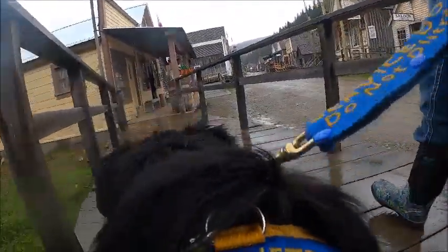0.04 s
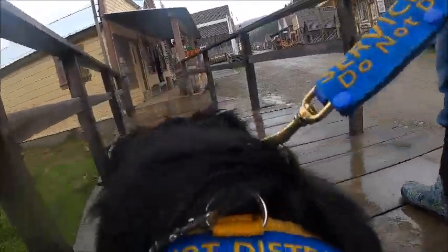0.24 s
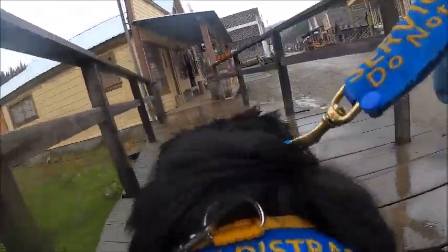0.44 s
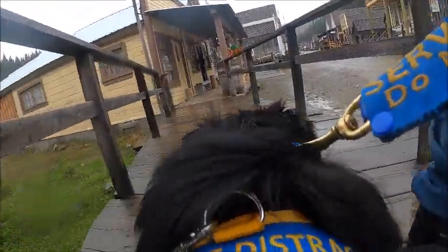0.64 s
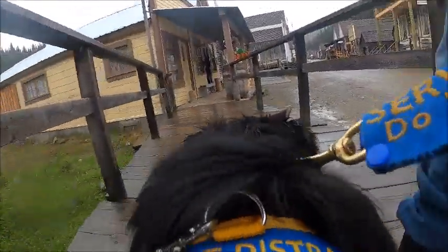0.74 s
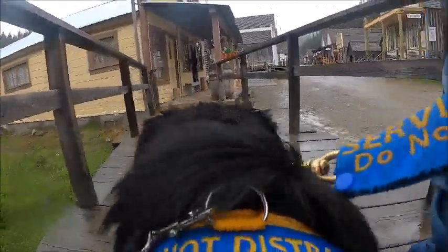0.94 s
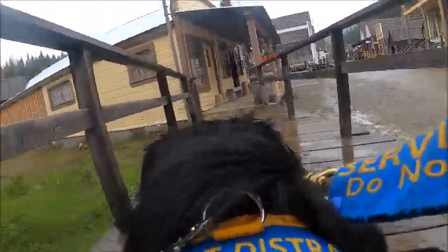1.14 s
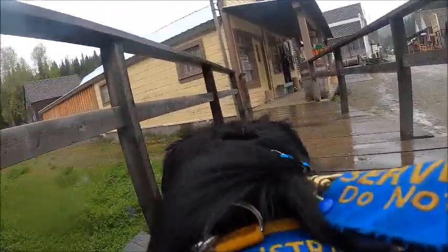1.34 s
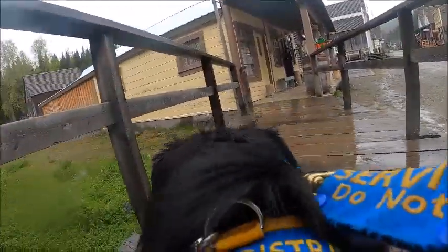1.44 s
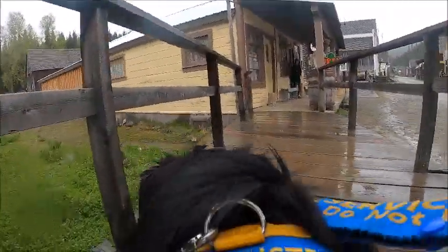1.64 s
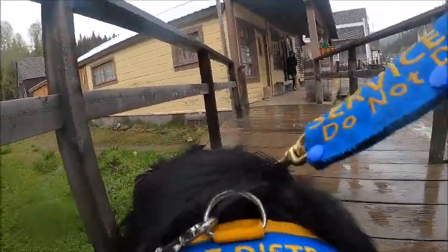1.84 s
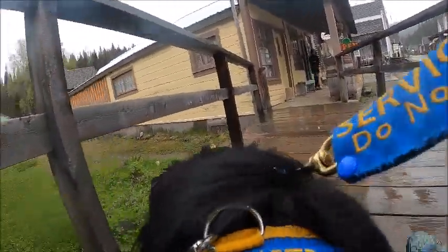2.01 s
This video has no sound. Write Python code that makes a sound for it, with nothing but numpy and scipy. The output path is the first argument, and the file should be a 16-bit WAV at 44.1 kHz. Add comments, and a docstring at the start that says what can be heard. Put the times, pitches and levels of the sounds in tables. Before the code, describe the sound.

Close on a walking dog's harness, uneven low bumps and small plastic ticks come first, then a light clip rattle and woody footfalls, the heaviest pair around one and a half seconds, outdoors.

```python
"""A wet boardwalk outdoors, with a camera on a dog's harness beside a walker in rubber boots.
Boots and paws knock the boards, which ring in their modes while grit crunches under the sole.
The gait jolts the camera in sagging low thumps and ticks its mount in short hollow pulses.
The leash clip clinks and rattles as metal contacts excite its modes; fabric rustles in small grains
and the harness sways in lumpy low noise, over a soft hiss of filtered noise."""
import sys
import numpy as np
from scipy import signal
from scipy.fft import rfft, irfft
from scipy.io import wavfile
from scipy.ndimage import uniform_filter1d

SR = 44100
rng = np.random.default_rng(int(sys.argv[2]) if len(sys.argv) > 2 else 0)


def generate_wav(signal):
    """Clip the signal to [-1, 1] and save it as 16-bit WAV at the path in sys.argv[1]."""
    frames = np.transpose(np.atleast_2d(signal))
    scaled = np.clip(frames, -1, 1) * 32767
    pcm = np.round(scaled).astype(np.int16)
    wavfile.write(sys.argv[1], SR, pcm)


def to_linear_factor(level_db):
    """Convert decibel levels (scalar or array-like) to linear amplitude factors."""
    exponent = np.asarray(level_db, float) / 20
    return 10 ** exponent


N = 91287  # length in samples


def evened(x):
    """Normalisation: scales a signal to unit root-mean-square."""
    return x / np.sqrt(np.mean(x ** 2) + 1e-20)


def read(points, hz):
    """Interpolation of a spectrum table along logarithmic frequency."""
    f, value = np.transpose(points)
    return np.interp(np.log(hz + 1), np.log(f + 1), value)


def curve(rows):
    """Interpolation of an envelope table along time."""
    return np.interp(np.arange(N) / SR, *np.transpose(rows))


def add(mix, s, sound):
    """Superposition: adds a sound to the mix from s seconds on."""
    part = mix[..., round(s * SR):][..., :sound.shape[-1]]
    part += sound[..., :part.shape[-1]]


def panned(x, db):
    """Level difference: the left channel exceeds the right by db."""
    return x * to_linear_factor(np.array([db / 2, -db / 2])).reshape(2, -1)


def coloured(x, tone):
    """Linear filtering: shapes x by a spectrum table, then evens its level."""
    hz = np.fft.rfftfreq(N, 1 / SR)
    return evened(irfft(rfft(x) * to_linear_factor(read(tone, hz)), N))


def blip(hz, cycles):
    """Windowed oscillation: a few cycles under a bell-shaped window, peak 1."""
    u = np.arange(1200) / SR * hz / max(cycles, 1) - 1
    x = np.exp(-5 * u ** 2) * np.cos(2 * np.pi * cycles * u)
    return x / abs(x).max()


def grains(per_s, spread_db):
    """Random point process: sparse impulses of either sign and scattered level."""
    heights = to_linear_factor(spread_db * np.minimum(rng.exponential(1, N), 4))
    signs = rng.choice([-1., 1.], N)
    return heights * signs * (rng.random(N) < per_s / SR)


def noise_pair(same):
    """Partial coherence: two noise channels share a part set by likeness same(Hz)."""
    a, b = rfft(rng.standard_normal((2, N)))
    same = np.clip(same, 0, 1)
    return irfft(np.array([a, same * a + np.sqrt(1 - same ** 2) * b]), N)


# Balance of the two microphone ports. Each row: frequency in Hz, left-right level in dB.
PORT_BALANCE = [(300, -0.5), (4000, 2.5), (8000, 0)]


def ports(x):
    """Interaural-style cues: the two ports receive sound with their own delay and level."""
    lag_s = .00003  # left lags right
    hz = np.fft.rfftfreq(N, 1 / SR)
    half = to_linear_factor(read(PORT_BALANCE, hz) / 2) * np.exp(-1j * np.pi * hz * lag_s)
    return irfft(rfft(x) * np.array([half, 1 / half]), N)


def echo(x):
    """Early reflections: rails and walls return short, scattered, decaying copies."""
    t60_s, level_db = .09, -7
    t = np.arange(round(.15 * SR)) / SR
    signs = rng.choice([-1., 1.], (2, len(t)))
    present = rng.random((2, len(t))) < .05
    taps = signs * present * to_linear_factor(-60 * t / t60_s) * (t > .002)
    taps = taps / np.linalg.norm(taps[0])
    return to_linear_factor(level_db) * signal.fftconvolve(x[None], taps, axes=1)[:, :N]


# Spectrum of the outdoor wash. Each row: frequency in Hz, relative level in dB.
HISS_TONE = [(60, -1.5), (270, -10.5), (870, -20), (1600, -17.5), (3300, -29.5), (7600, -30.5), (8800, -42),
             (14000, -49)]
# Coherence of the wash. Each row: frequency in Hz, left-right likeness from 0 to 1.
HISS_LIKENESS = [(300, 0.86), (2400, 0.46), (12000, 0.13)]


def hiss():
    """Diffuse field: a distant outdoor wash, less alike at the two ports as frequency rises."""
    level_db = -56
    pair = noise_pair(read(HISS_LIKENESS, np.fft.rfftfreq(N, 1 / SR)))
    return to_linear_factor(level_db) * coloured(pair, HISS_TONE)


# Envelope of the harness rumble. Each row: time in seconds, level in dB before the lumps.
SWAY_LEVEL = [(0, -64), (.07, -41.5), (.14, -54.5), (.24, -65), (.29, -34.5), (.34, -51.5), (.45, -42),
              (.62, -37), (.8, -49.5), (.94, -39.5), (1.04, -48.5), (1.16, -38.5), (1.38, -65), (1.48, -59),
              (1.54, -39.5), (1.8, -36.5), (2.0, -45.5)]
# Spectrum of the rumble. Each row: frequency in Hz, relative level in dB.
SWAY_SPECTRUM = [(15, -6), (45, 1.5), (93, -11), (226, -21), (450, -37.5), (900, -70)]
# Coherence of the rumble. Each row: frequency in Hz, left-right likeness from 0 to 1.
SWAY_LIKENESS = [(30, .35), (70, .5), (140, .95)]


def sway():
    """Amplitude modulation: slow random lumps swell a low rumble as the harness shifts."""
    lumps_db, pan_db = 3, 1
    smooth = uniform_filter1d(rng.standard_normal(N), 1000)
    lumps = evened(uniform_filter1d(smooth, 1000))
    level = to_linear_factor(curve(SWAY_LEVEL) + lumps_db * lumps)
    pair = noise_pair(read(SWAY_LIKENESS, np.fft.rfftfreq(N, 1 / SR)))
    return panned(level, pan_db) * coloured(pair, SWAY_SPECTRUM)


# Envelope of fabric, wet fur and scuffing. Each row: time in seconds, level in dB.
RUSTLE_LEVEL = [(0, -65), (.12, -62.5), (.22, -55.5), (.33, -58), (.45, -55), (.55, -59), (.62, -66.5),
                (.85, -64), (1.0, -65), (1.1, -60), (1.2, -55.5), (1.27, -68.5), (1.59, -59.5), (1.63, -51),
                (1.7, -58.5), (1.79, -51.5), (1.84, -61), (2.0, -61)]
# Spectral weighting of the rustle. Each row: frequency in Hz, relative level in dB.
RUSTLE_SPECTRUM = [(400, -10), (900, -5.5), (1500, 2.5), (2800, -2.5), (4000, 1.5), (7500, -4),
                   (9000, -6.5), (15500, -21)]


def rustle():
    """Granular friction: small grains of many pitches, partly different at each port."""
    per_s, spread_db, cycles = 550, 4.2, 6.004  # grain rate is for each pitch

    def train():
        """Superposition of grain trains at logarithmically spaced pitches."""
        pitches = np.geomspace(450, 14500, num=14)
        return sum(np.convolve(grains(per_s, spread_db), blip(hz, cycles))[:N] for hz in pitches)

    shared = train()
    separate = np.array([train(), train()])
    return to_linear_factor(curve(RUSTLE_LEVEL)) * coloured(shared + 0.33 * separate, RUSTLE_SPECTRUM)


# Jolts through the harness. Each row: start in seconds, level in dB before onset and fade,
# frequency it settles to in Hz, 60 dB decay time in seconds before the fade, left-right level in dB.
JOLT_EVENTS = [(0.263, -20.5, 91, 0.05, 1), (0.657, -41, 37.5, 1, 24.5), (.72, -28.5, 33.4, 0.19, 17.5),
               (.755, -39.5, 110.4, 0.33, 3), (1.161, -30.5, 35.6, 0.3, 11.5),
               (1.712, -11.5, 75.4, 0.07, 0.5), (1.752, -30.5, 55.7, 0.25, 14),
               (2.055, -24.5, 54, 0.91, 13.5)]


def jolts():
    """Damped oscillation: soft low thumps whose pitch sags as they die."""
    rise_s, sag_s, sag_depth = 0.0057, 0.0094, 1.65
    out, t = np.zeros((2, N)), np.arange(round(.3 * SR)) / SR
    onset, fade = 1 - np.exp(-t / rise_s), 1 - t / t[-1]
    for s, db, hz, t60, pan_db in JOLT_EVENTS:
        turns = hz * t * (1 + sag_depth * np.exp(-t / sag_s))
        thump = to_linear_factor(db - 60 * t / t60) * onset * fade * -np.sin(2 * np.pi * turns)
        add(out, s, panned(thump, pan_db))
    return out


# Dull ticks of the mount. Each row: start in seconds, peak of the knock in dB, frequency in Hz.
TICK_EVENTS = [(0.241, -19, 1470), (0.244, -39, 1480), (.282, -35.5, 1200), (0.566, -33, 1230),
               (0.689, -32, 1270), (0.988, -33.5, 1530), (1.09, -35.5, 840), (1.119, -36, 1560),
               (1.211, -30, 970), (1.342, -37, 1560), (1.786, -51, 1310), (1.893, -39.5, 1300),
               (1.953, -32.5, 1294)]


def ticks():
    """Impulse and resonance: short plastic knocks followed by a brief hollow two-tone ring."""
    cycles, ring_db, ring_t60_s = 1.145, -25, 0.045
    out, t = np.zeros(N), np.arange(1500) / SR
    for s, db, hz in TICK_EVENTS:
        add(out, s, to_linear_factor(db) * blip(hz, cycles))
        tones = np.sin(2 * np.pi * hz * t) + np.sin(1.25 * np.pi * hz * t)
        ring = to_linear_factor(db + ring_db - 60 * t / ring_t60_s) * tones
        add(out, s + cycles / hz, ring)  # from the middle of the knock
    return out


# Modes of the leash clip. Each row: frequency in Hz, level in dB before selection by pitch,
# 60 dB decay time in seconds when undamped.
CLIP_MODES = [(4280, 3, .018), (6225, 0, .04), (7100, -9, .025), (8160, -6, .045), (10100, -4, .03),
              (11700, 1, .035), (14250, -8, .04)]


def clip_ring(hz, octaves, damping=1):
    floor = .07  # weight left to far modes
    t = np.arange(4000) / SR
    ring = np.zeros(len(t))
    for f, db, t60 in CLIP_MODES:
        weight = floor + np.exp(-(np.log2(f / hz) / octaves) ** 2)
        ring += weight * to_linear_factor(db - 60 * damping * t / t60) * np.sin(2 * np.pi * f * t)
    return ring


# Clip sliding on its ring. Each row: time in seconds, level in dB.
RATTLE_LEVEL = [(.4, -53), (.425, -64), (.45, -53.5), (.515, -64), (.54, -46), (.556, -57)]


def rattle():
    per_s, spread_db = 520, 5
    damping = 2.5  # sliding contact shortens the ring
    t = np.arange(N) / SR
    on = (t > RATTLE_LEVEL[0][0]) & (t < RATTLE_LEVEL[-1][0])
    hum = signal.oaconvolve(grains(per_s, spread_db), clip_ring(4980, 0.37, damping))[:N]
    return on * to_linear_factor(curve(RATTLE_LEVEL)) * evened(hum)


# Leash clip clinks. Each row: start in seconds, peak of the tick in dB, tick frequency in Hz,
# gain of the ring in dB relative to that peak.
CLINK_EVENTS = [(0.238, -39, 6200, -21), (0.318, -39.5, 3800, -18), (.338, -38.5, 4140, -37),
                (0.36, -42, 6430, -14), (0.407, -43.5, 4470, 2.5), (0.5142, -35, 6500, -29),
                (0.52, -45.5, 10800, -2), (0.535, -40, 11000, -24), (0.546, -41, 6200, 1),
                (0.798, -46.5, 3550, -35), (1.039, -46.5, 3060, -28), (1.088, -39, 3940, -8),
                (1.094, -39, 8400, -5), (1.117, -48.5, 7060, -5), (1.197, -38, 3450, -9),
                (1.209, -47.5, 7600, 1), (1.341, -46, 6940, 3.5), (1.977, -33.5, 5000, -27),
                (2.046, -39, 3720, -1)]


def clinks():
    """Impact excitation: a burst of metal contacts gives a tick, a bright snap and a modal ring."""
    cycles, burst_s, snap_db, pick_octaves = 1.493, 0.0028, -9, .25
    out, u = np.zeros(N), np.arange(400) / SR / burst_s
    for s, db, hz, ring_db in CLINK_EVENTS:
        burst = rng.standard_normal(len(u)) * u * np.exp(-4 * u)
        tick = np.convolve(burst, blip(hz, cycles))
        snap = np.diff(burst)  # differencing favours the treble
        ring = np.convolve(burst, clip_ring(hz, pick_octaves)) / np.linalg.norm(burst)
        add(out, s, to_linear_factor(db) * tick / abs(tick).max())
        add(out, s, to_linear_factor(db + snap_db) * snap / abs(snap).max())
        add(out, s, to_linear_factor(db + ring_db) * ring)
    return out


# Resonances of the crunch under the sole, a list of frequencies in Hz.
CRUNCH_MODES = [593, 810, 985, 1270, 1630, 1970, 2350]


def crunch(noise, draw, t):
    """Granular excitation: a dying shower of grit rings woody resonances under the sole."""
    per_s, t60_s, ring_t60_s = 1200, 0.13, 0.014
    short = t[:2000]
    woody = np.zeros(len(short))
    for hz in CRUNCH_MODES:
        woody += np.sqrt(CRUNCH_MODES[0] / hz) * np.sin(2 * np.pi * hz * short)
    woody *= to_linear_factor(-60 * short / ring_t60_s)
    grit = noise * (draw < per_s / SR) * to_linear_factor(-60 * t / t60_s)
    grit[0] = 2  # first contact
    grit = np.convolve(grit, np.hanning(12) / 5)  # rubber softens each grain
    return signal.fftconvolve(grit, woody) / len(CRUNCH_MODES)


# Boots and paws on the boards. Each row: start in seconds, peak of the knock in dB before panning,
# left-right level in dB, brightness in dB per octave about 200 Hz.
KNOCK_EVENTS = [(0.5025, -28, 1.5, -11.5), (.58, -37.5, 2, -3.5), (0.919, -41, 1.5, 3.5),
                (1.138, -41.5, 0.5, 0.5), (1.5136, -22.5, 7.5, 1.5), (1.5817, -18, 4, -0.5),
                (1.818, -44.5, 11.5, -17), (1.951, -38, 2, -2.5)]
# Modes of the boards. Each row: frequency in Hz before detuning, level in dB before the brightness
# tilt, 60 dB decay time in seconds.
BOARD_MODES = [(134.7, -18, 0.21), (157, -4.5, 0.13), (206.4, 4, 0.073), (237, 2.5, 0.032),
               (297.6, -6, .12), (341, 2.5, 0.047), (393, -6.5, 0.084), (434, -10, 0.079)]


def boards():
    """Modal impact: each blow and its scattered after-bounces ring the boards, with grit beneath."""
    spread, bounce_db, bounce_t60_s, crunch_db = 0.029, -4, 0.29, -8.5
    contact_s, soften_db = 0.0019, 13  # a blow soften_db duller lasts twice as long
    low_cut = signal.butter(2, 120, "high", fs=SR, output="sos")  # the knocks carry little below 120 Hz
    out, t = np.zeros((2, N)), np.arange(round(.4 * SR)) / SR
    for s, db, pan_db, bright_db in KNOCK_EVENTS:
        detune = rng.uniform(-1.38, 1, len(BOARD_MODES))
        noise, draw = rng.standard_normal((2, len(t))), rng.random(len(t))
        ring = np.zeros(len(t))
        for (f, mode_db, t60), shift in zip(BOARD_MODES, detune):
            level_db = mode_db + bright_db * np.log2(f / 200)
            ring -= to_linear_factor(level_db - 60 * t / t60) * np.sin(2 * np.pi * f * (1 + spread * shift) * t)
        contact = np.hanning(round(contact_s * 2 ** (-bright_db / soften_db) * SR))
        bounces = evened(np.convolve(noise[0], contact, "same"))
        drive = bounces * to_linear_factor(bounce_db - 60 * t / bounce_t60_s) / np.sqrt(SR / 5)
        drive[:len(contact)] += contact / contact.sum()
        knock = signal.sosfilt(low_cut, signal.fftconvolve(drive, ring))
        add(out, s, panned(to_linear_factor(db) * knock / abs(knock).max(), pan_db))
        grit = crunch(noise[1], draw, t)
        add(out, s, panned(to_linear_factor(db + crunch_db + 2 * bright_db) * grit, pan_db))
    return out


def scene():
    near = ticks() + clinks() + rattle()
    return ports(near + rustle() + hiss()) + echo(near) + boards() + jolts() + sway()


def low_pass(x):
    """Removes everything above the highest recorded frequency."""
    return signal.sosfilt(signal.butter(12, 15820, fs=SR, output="sos"), x)


def record(dry):
    """Signal chain: the finished mix passes through a steep low-pass that ends the treble, with no further
    gain."""
    return low_pass(dry)


dry = scene()
out = record(dry)
generate_wav(out)
```